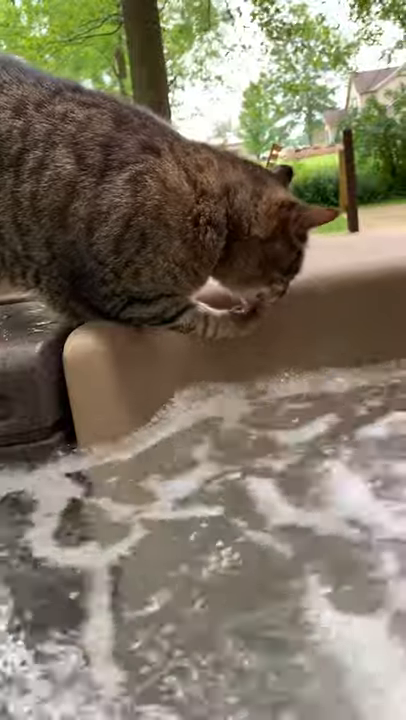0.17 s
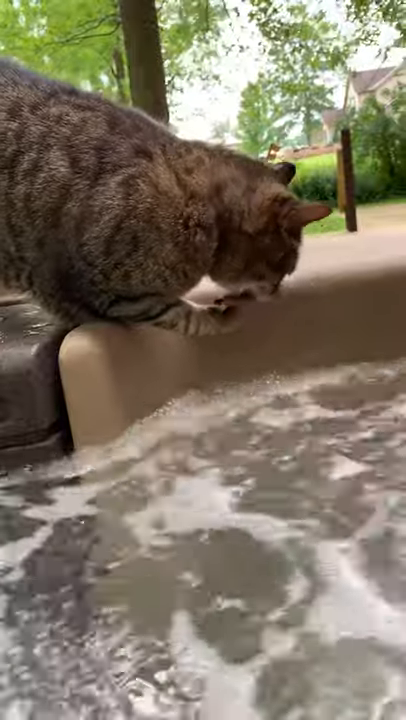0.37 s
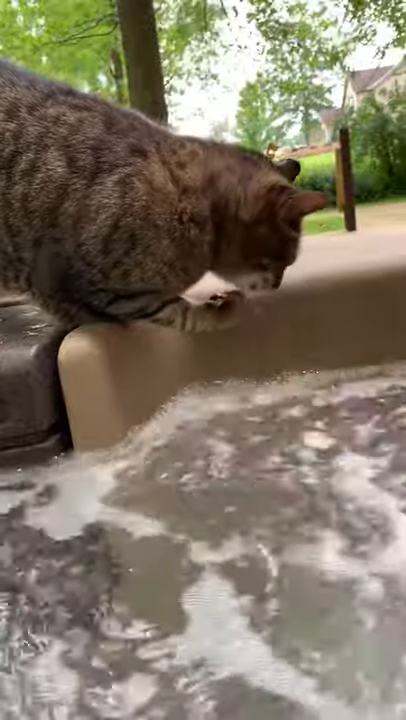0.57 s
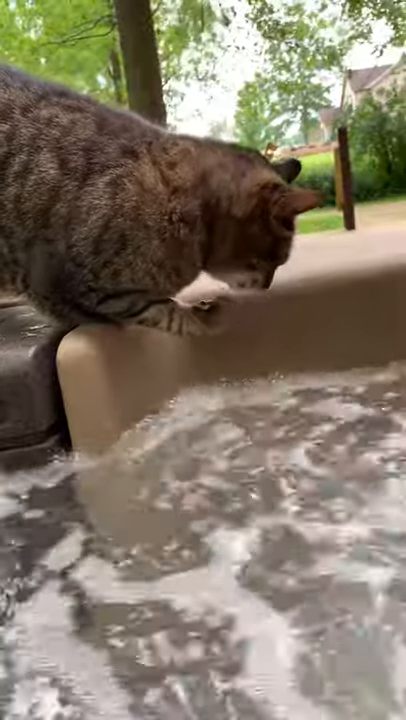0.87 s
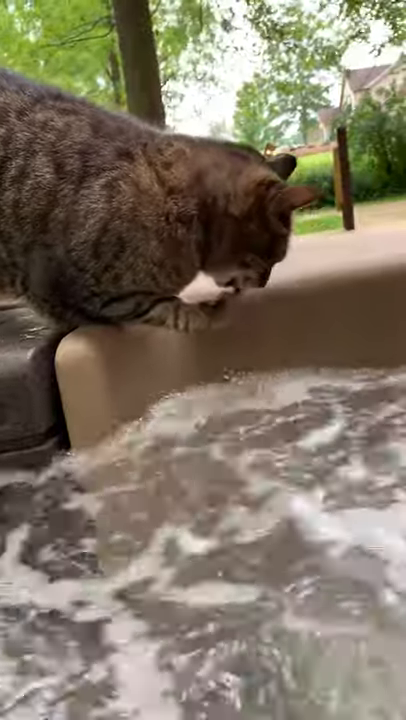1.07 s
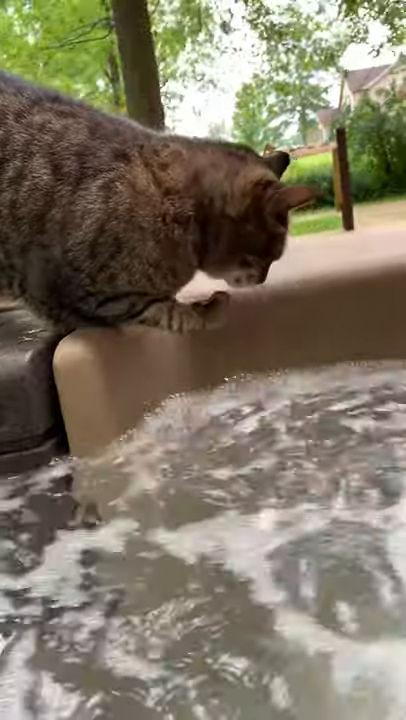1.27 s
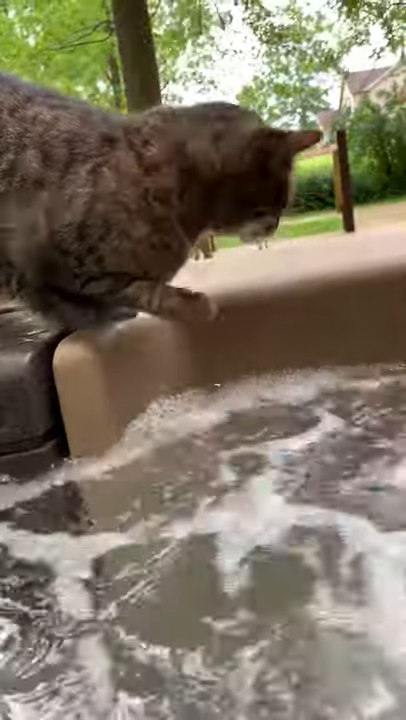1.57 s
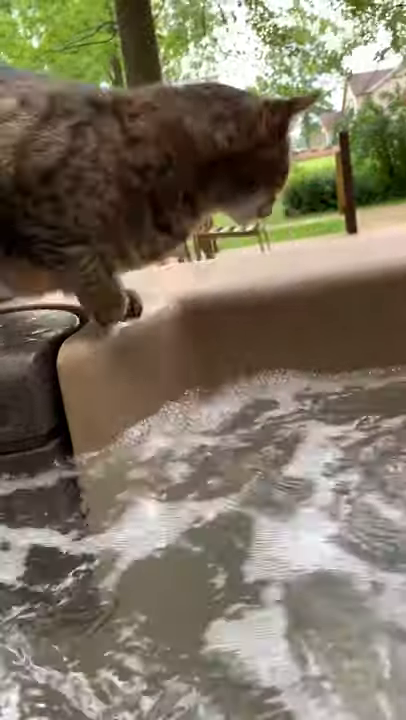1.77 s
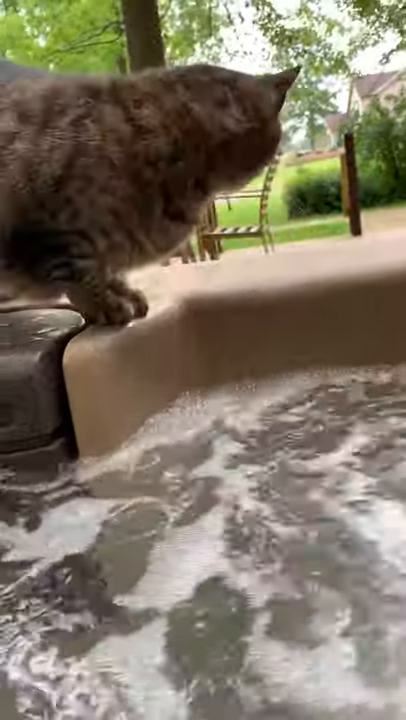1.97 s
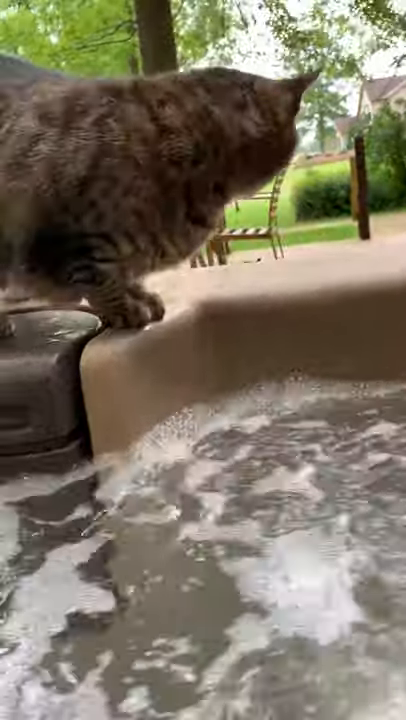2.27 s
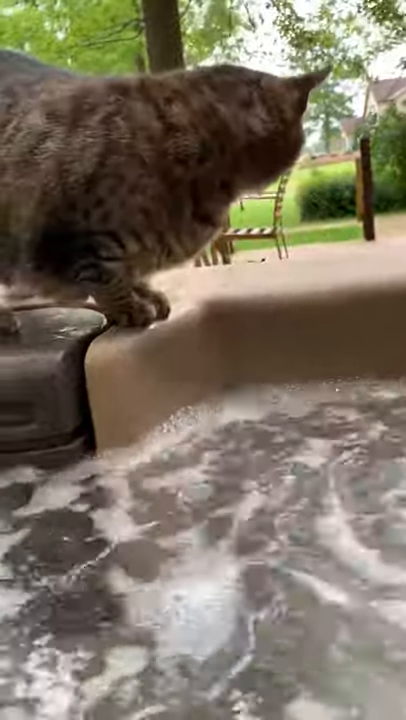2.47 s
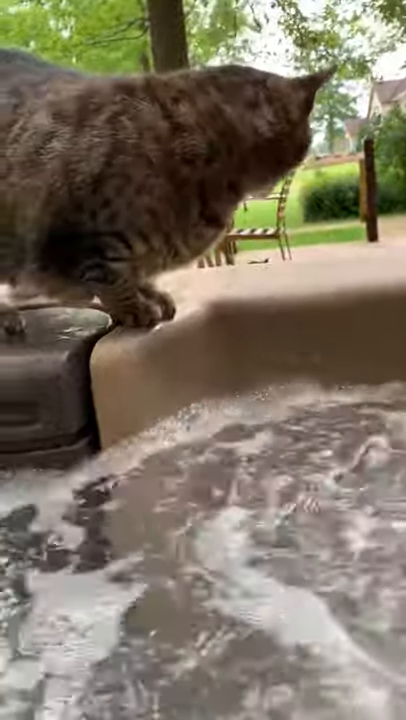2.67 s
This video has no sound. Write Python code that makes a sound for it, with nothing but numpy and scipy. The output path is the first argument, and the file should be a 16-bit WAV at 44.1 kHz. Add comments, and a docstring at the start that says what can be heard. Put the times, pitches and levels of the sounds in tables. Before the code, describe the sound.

Churning hot tub water gurgles and fizzes steadily, with low thumps, drips and faint chirps

```python
"""A steady watery boil: hot tub jets churn the water outdoors, heard close by.
Big bubbles ring on patchy noise; foam hisses above them with small pops and crackles.
Low rumble swells; crisp drips, low thumps, short splashes and a high tick stand out over a pump hum.
A few faint gliding chirps come through.
The foam lies to the left, so its hiss reaches the left microphone port first."""
import sys
import numpy as np
from scipy import signal
from scipy.fft import rfft, irfft, next_fast_len
from scipy.io import wavfile
from scipy.ndimage import uniform_filter1d, map_coordinates

SR = 44100
rng = np.random.default_rng(int(sys.argv[2]) if len(sys.argv) > 2 else 0)


def to_wav(s):
    """Save 16-bit WAV."""
    ch = np.atleast_2d(s).T  # columns
    pcm = np.round(np.clip(ch, -1, 1) * 32767)  # PCM
    wavfile.write(sys.argv[1], SR, pcm.astype(np.int16))


N = 125244
TIME_S = np.arange(N) / SR


def amp(db):
    """Decibels to gain."""
    return 10 ** (np.asarray(db) / 20)


def unit(x):
    """Scale to rms 1 over all channels."""
    return x / np.sqrt(np.mean(x ** 2) + 1e-20)


def along(points, hz):
    """Read (Hz, value) points on a log frequency axis."""
    point_hz, value = np.transpose(points)
    return np.interp(np.log(hz + 1), np.log(point_hz + 1), value)


def curve(rows):
    """Interpolate (s, value) rows to one value per sample."""
    return np.interp(TIME_S, *np.transpose(rows))


def wobble(knots_per_s):
    """Smooth random curve through normally distributed knots."""
    knots = rng.standard_normal(N // 8)
    return map_coordinates(knots, [np.arange(N) * knots_per_s / SR], mode="mirror")


def filtered(x, response):
    """Apply a complex response of frequency, zero-padded by at least half a second."""
    size = next_fast_len(N + SR // 2)
    hz = np.fft.rfftfreq(size, 1 / SR)
    return irfft(rfft(x, size) * response(hz), size)[..., :N]


def coloured(x, spectrum):
    """Filter by a (Hz, dB) spectrum, at rms 1."""
    return unit(filtered(x, lambda hz: amp(along(spectrum, hz))))


def rush(patchy_db):
    """Turbulence: two unrelated noises under one random gain field, smooth in time and frequency."""
    bins = signal.stft(rng.standard_normal((2, N)), nperseg=256)[2]
    field = rng.standard_normal(bins.shape[1:])
    field = uniform_filter1d(field, size=4, axis=0)
    field = uniform_filter1d(field, size=10, axis=1)
    noise = signal.istft(bins * amp(patchy_db * unit(field)), nperseg=256)[1]
    return unit(noise[:, :N])


def bubble(turns, cycles):
    """A bubble's ring: decays 60 dB in its cycles of life while the pitch rises as it surfaces."""
    rise = 0.042  # share of pitch gained over the life
    age = turns / cycles
    ring = np.sin(2 * np.pi * turns * (1 + rise * age / 2))
    decay = np.exp(-np.log(1000) * age)
    attack = 1 - np.exp(-2 * turns)
    return ring * decay * attack


def swarm(rate_per_s, lo_hz, hi_hz, cycles, spread_db):
    """Two unrelated streams of random bubbles, about even in power per Hz, at rms 1."""
    count = int(2 * rate_per_s * N / SR)
    when, pitch, size = np.random.default_rng(rng.integers(2 ** 31)).random((count, 3)).T
    hz = lo_hz * (hi_hz / lo_hz) ** pitch
    # exponential spread in dB, capped at 5 * spread_db
    gain = hz * amp(-spread_db * np.log(np.maximum(size, np.exp(-5))))
    k = np.arange(int(cycles * SR / lo_hz * .5))  # half the life of the lowest bubble
    rings = gain[:, None] * bubble(hz[:, None] * k / SR, cycles)
    at = (when * 2 * N).astype(int)[:, None] + k
    # one double-length stream, cut into two channels
    stream = np.bincount(at.ravel(), rings.ravel(), 2 * N)[:2 * N]
    return unit(stream.reshape(2, N))


def churn():
    """The boil: ringing big bubbles on turbulent noise."""
    # strength before trim: time_s, level_db
    boil_levels = [(.1, -38.5), (.4, -37), (.7, -38.5), (.86, -36.5), (1.05, -39), (1.6, -38), (1.9, -38.5),
                   (2.18, -37.5), (2.45, -39.5), (2.83, -38.5)]
    # colour of noise and bubbles: frequency_hz, relative_level_db
    churn_spectrum = [(40, -29), (90, -27), (125, -2.5), (180, 0.5), (225, -2), (280, -2.5), (355, -0.57),
                      (410, -5), (490, -5), (600, -7.5), (750, -11.5), (1000, -12), (1400, -17),
                      (2000, -23.5), (4000, -32), (9000, -70)]
    trim_db, glug_db = 2, -4
    glugs = swarm(rate_per_s=520, lo_hz=151.1, hi_hz=1810, cycles=18.8, spread_db=0.6)
    water = coloured(rush(patchy_db=2.0), churn_spectrum)
    water = water + amp(glug_db) * coloured(glugs, churn_spectrum)
    return amp(curve(boil_levels) + trim_db + 0.37 * wobble(22.57)) * unit(water)


def foam():
    """Small bubbles burst in a hiss, with nearer pops and crackles."""
    # hiss before trim: time_s, level_db
    foam_levels = [(.1, -45), (.7, -44.5), (1.2, -44.5), (1.55, -44), (1.85, -44.5), (2.2, -44), (2.5, -44),
                   (2.83, -44)]
    # colour of hiss and crackle: frequency_hz, relative_level_db
    fizz_spectrum = [(300, -43), (1000, -4), (1900, -1), (2700, -0.5), (3600, -2), (5000, 2), (7000, 0.1),
                     (9000, -3.1), (11000, -3), (13000, -7.5), (16000, -8.5)]
    trim_db, pop_db, crackle_db = 1.5, -14.5, -12
    pops = swarm(rate_per_s=600, lo_hz=1000, hi_hz=4520, cycles=8.2, spread_db=1)
    crackle = swarm(rate_per_s=2600, lo_hz=3400, hi_hz=14500, cycles=1.5, spread_db=2.5)
    hiss = coloured(rush(patchy_db=1.6), fizz_spectrum)
    hiss = hiss + amp(crackle_db) * coloured(crackle, fizz_spectrum) + amp(pop_db) * pops
    return amp(curve(foam_levels) + trim_db + 0.31 * wobble(30.25)) * unit(hiss)


def rumble():
    """Water wells up over the jets: low noise with a drawn swell."""
    # swell before trim: time_s, level_db
    surge_levels = [(.1, -41.5), (.7, -39), (.91, -37.5), (1.0, -40), (1.06, -46), (1.13, -38),
                    (1.24, -39.5), (1.29, -33.5), (1.43, -41), (1.465, -30.5), (1.555, -31), (1.59, -33.5),
                    (1.66, -37.5), (1.71, -40), (2.0, -37), (2.19, -37.5), (2.33, -38), (2.45, -40),
                    (2.83, -40.5)]
    # colour of the noise: frequency_hz, relative_level_db
    rumble_spectrum = [(15, -18), (25, -8), (36, 1), (60, -1.5), (95, -0.5), (130, -2), (190, -23),
                       (400, -32), (900, -84)]
    trim_db = -1
    noise = coloured(rng.standard_normal((2, N)), rumble_spectrum)
    return amp(curve(surge_levels) + trim_db) * noise


def noise_bursts():
    """Short decaying bursts of band noise: splashes, and one high tick near the end."""
    # bursts: start_s, centre_hz, half_width_hz, t60_s, gain_db
    burst_table = [(.415, 2500, 800, 0.033, -34.5), (.6115, 2950, 400, 0.045, -39),
                   (0.63, 1700, 800, 0.05, -38), (.6414, 3130, 500, .05, -42),
                   (1.262, 1250, 600, 0.068, -38), (2.186, 6400, 2500, .07, -41),
                   (2.707, 2400, 1200, 0.083, -41), (2.814, 12500, 2500, .02, -28.5)]
    attack_s = 0.0024
    out = np.zeros((2, N))
    for start_s, centre_hz, width_hz, t60_s, gain_db in burst_table:
        age_s = np.maximum(TIME_S - start_s, 0)
        noise = rng.standard_normal((2, N))
        band = unit(filtered(noise, lambda hz: np.exp(-((hz - centre_hz) / width_hz) ** 2)))
        out += band * amp(gain_db - 60 * age_s / t60_s) * (1 - np.exp(-age_s / attack_s))
    return out


def short_rings():
    """Short decaying rings: crisp drips, low thumps, and random low peaks of the boil."""
    # rings: start_s, pitch_hz, gain_db
    ring_table = [(.415, 2810, -31), (.6125, 2950, -38), (0.621, 1310, -31), (.6414, 3100, -40),
                  (1.187, 1290, -36), (1.46, 45, -24), (1.515, 114, -24.5), (1.87, 175, -27.5),
                  (2.168, 554, -36), (2.18, 90.5, -21), (2.712, 1330, -31)]
    out = np.zeros(N)
    for start_s, hz, gain_db in ring_table:
        cycles = 34 * min(1, np.sqrt(hz / 800))  # low rings last fewer cycles
        out += amp(gain_db) * bubble(hz * np.maximum(TIME_S - start_s, 0), cycles)
    return out


def pump():
    """The pump's hum: a sine slightly unsteady in level and phase."""
    pump_hz, level_db = 99.1, -49
    gain = amp(level_db + 0.67 * wobble(4.63)) * np.sqrt(2)
    return gain * np.sin(2 * np.pi * pump_hz * TIME_S + 1.1 * wobble(7.02))


def chirps():
    """Short gliding whistles, perhaps birds in the trees: a thin tone, partly blurred by echoes."""
    # whistles: centre_s, length_s, pitch_hz, glide_hz_per_s, level_db
    chirp_table = [(1.51, 0.12, 2610, 1000, -51.5), (1.625, 0.046, 2395, -3300, -51),
                   (1.705, 0.057, 2140, -1500, -55), (2.168, 0.053, 3370, 0, -53.5),
                   (2.232, 0.061, 2660, -400, -53), (2.757, 0.013, 3180, 0, -49.5),
                   (2.80, 0.035, 3330, -600, -50), (2.834, 0.018, 3090, -6000, -43.5)]
    blur_knots_per_s, blur_share = 160, .7  # share of the nominal power
    out = np.zeros((2, N))
    for centre_s, length_s, hz, glide, level_db in chirp_table:
        t = TIME_S - centre_s
        blur = np.array([wobble(blur_knots_per_s) + 1j * wobble(blur_knots_per_s) for port in range(2)])
        carrier = np.exp(2j * np.pi * (hz + glide * t / 2) * t)
        tone = (np.sqrt(2 * (1 - blur_share)) + np.sqrt(blur_share) * blur) * carrier
        out += amp(level_db) * np.exp(-2 * (t / length_s) ** 2) * np.real(tone)
    return out


def ports(pair):
    """Mix two unrelated streams into the wide water surface as heard at two microphone ports."""
    # likeness of the ports: frequency_hz, correlation
    alike = [(40, 1), (200, 0.98), (350, 0.91), (500, 0.77), (650, 0.53), (800, 0.2), (1200, 0.62),
             (1700, 0.71), (2400, 0.52), (3000, 0.34), (3800, 1), (4700, 1), (7000, 1), (9000, 1),
             (13200, 0.91), (15000, 0.68)]
    # left minus right: frequency_hz, level_db
    balance = [(100, -0.2), (400, -0.6), (800, -2.5), (1300, -1.4), (2000, 0), (8000, 0)]
    # phase by which left leads: frequency_hz, lead_rad
    lead = [(0, 0), (400, -.25), (700, -.9), (900, .6), (1450, -.2), (2600, 1.3), (3500, 1.2), (4900, 3.14),
            (7000, 6.28), (15100, 18.85)]

    def mid_side(hz):
        angle = np.arccos(np.clip(along(alike, hz), 0, .999)) / 2
        return np.array([np.cos(angle), np.sin(angle)])

    def offset(hz):
        half = np.array([[.5], [-.5]])  # half to each port, opposite signs
        phase = np.interp(hz, *np.transpose(lead))
        return amp(half * along(balance, hz)) * np.exp(1j * half * phase)

    mid, side = filtered(pair, mid_side)
    return filtered(np.array([mid + side, mid - side]), offset)


def scene():
    """Wide water through the ports, plus centred rings and pump, and the chirps."""
    water = churn() + foam() + rumble() + noise_bursts()
    return ports(water) + short_rings() + pump() + chirps()


def record(dry):
    """Silence before the start, then a steep low-pass at the band limit."""
    start_s, top_hz = .084, 15850
    return filtered(dry * (TIME_S > start_s), lambda hz: 1 / (1 + (hz / top_hz) ** 200))


dry = scene()
out = record(dry)
to_wav(out)
```